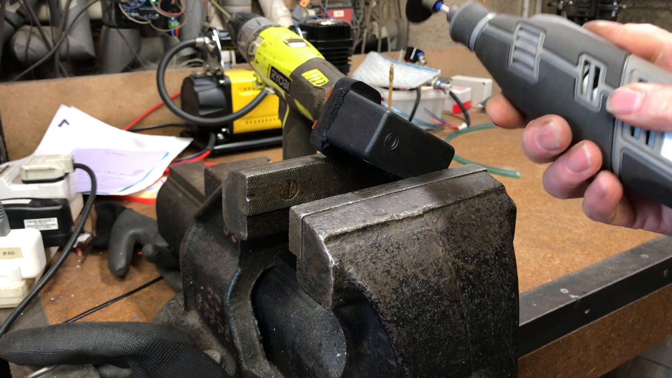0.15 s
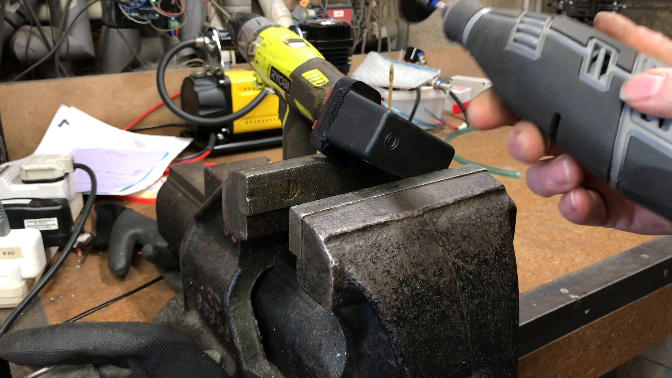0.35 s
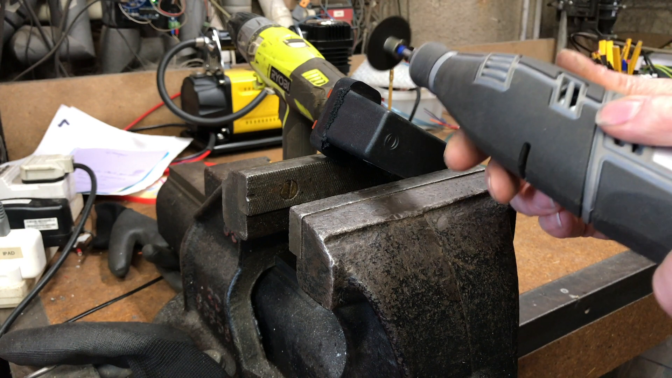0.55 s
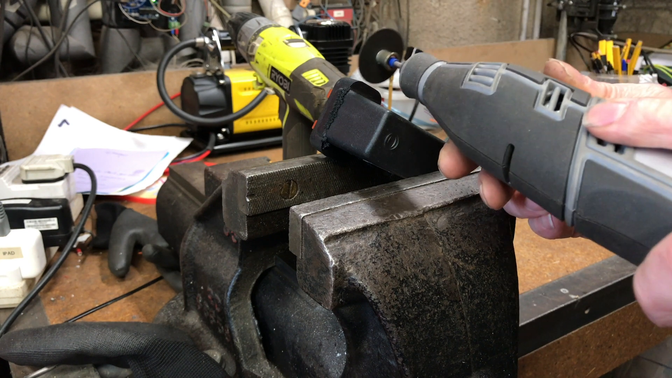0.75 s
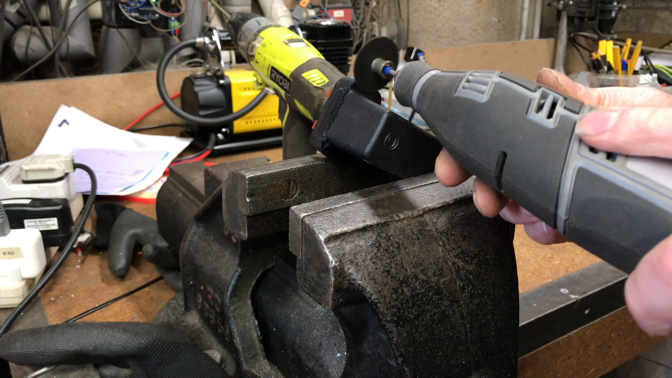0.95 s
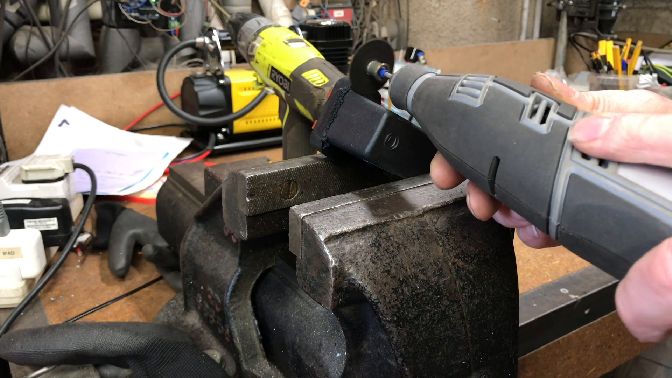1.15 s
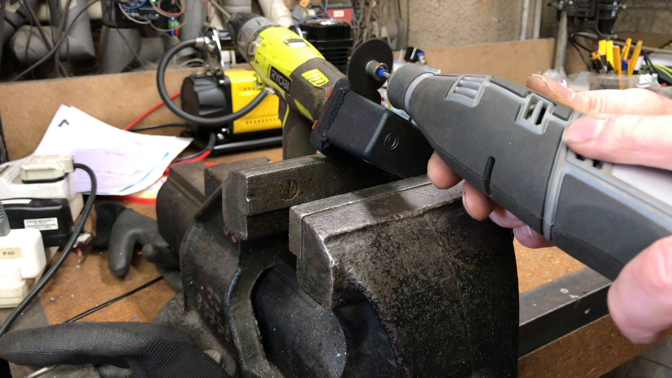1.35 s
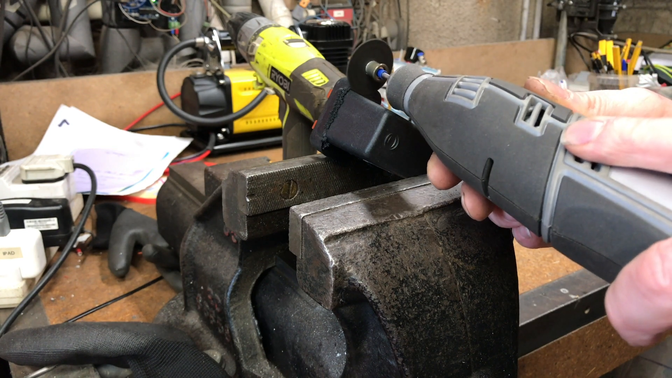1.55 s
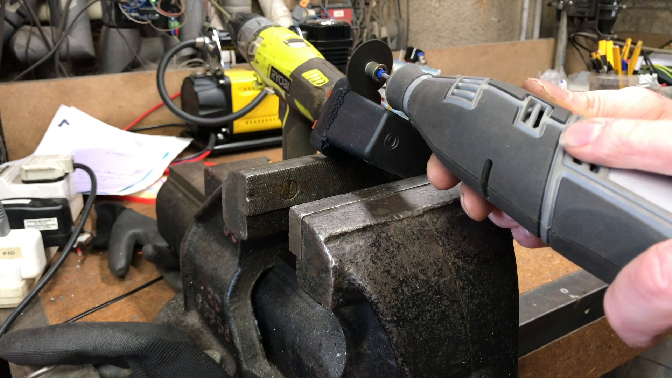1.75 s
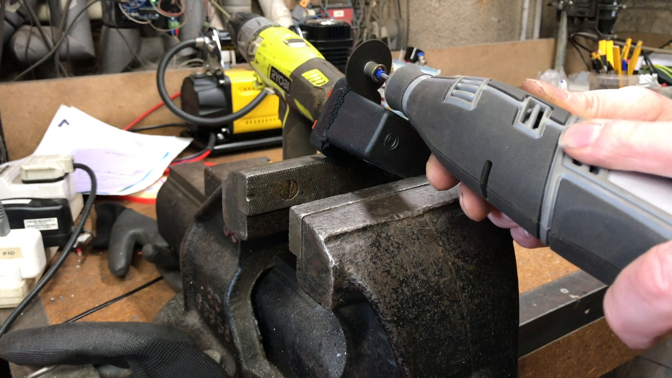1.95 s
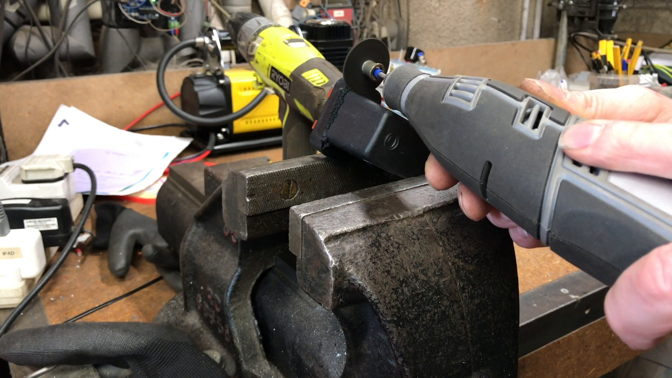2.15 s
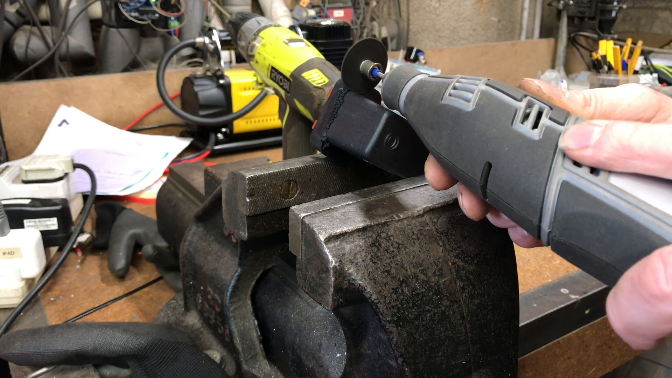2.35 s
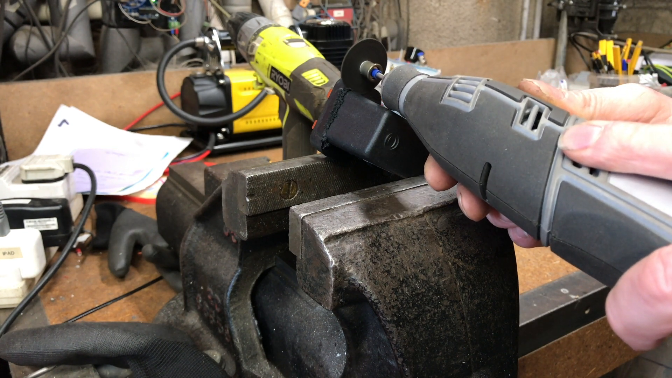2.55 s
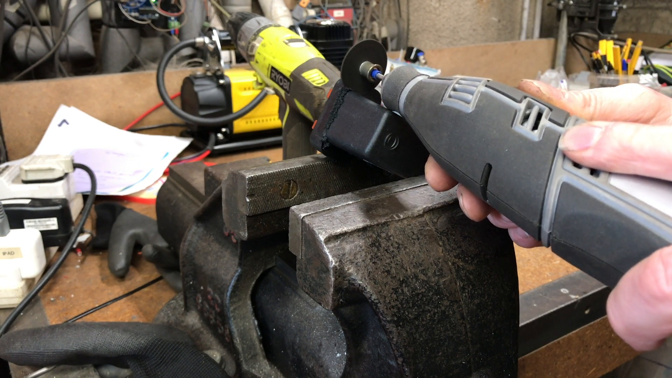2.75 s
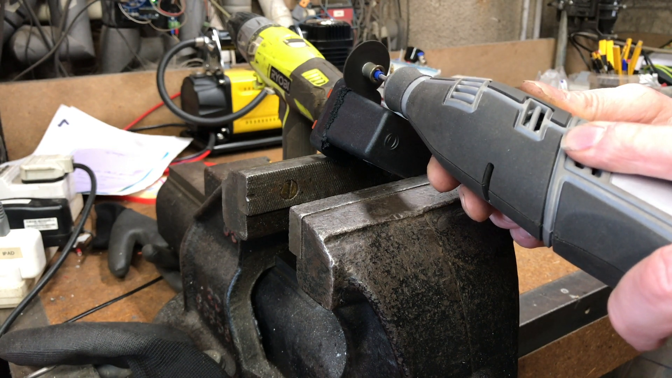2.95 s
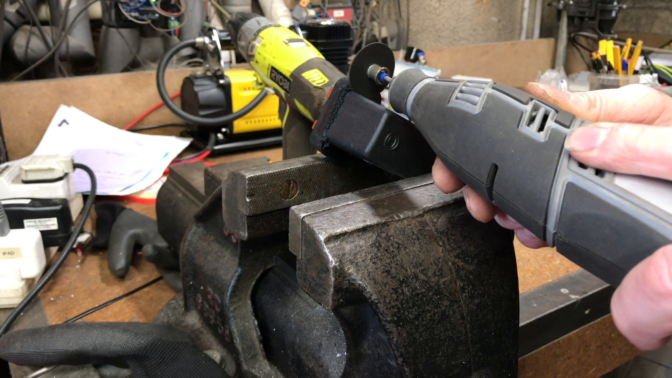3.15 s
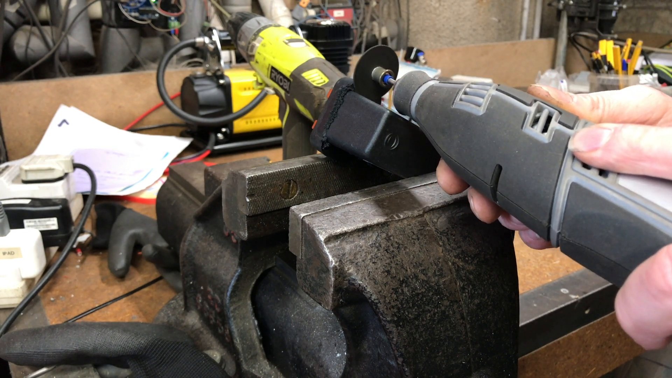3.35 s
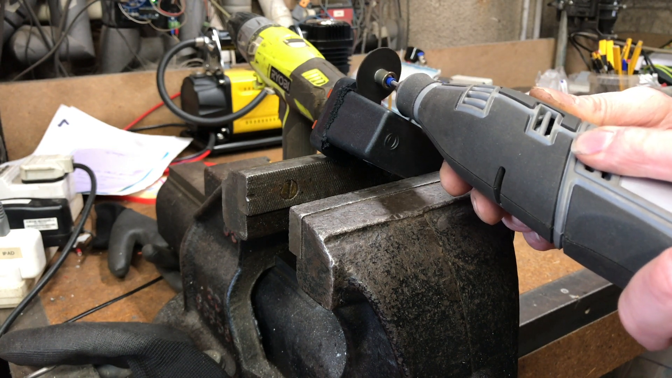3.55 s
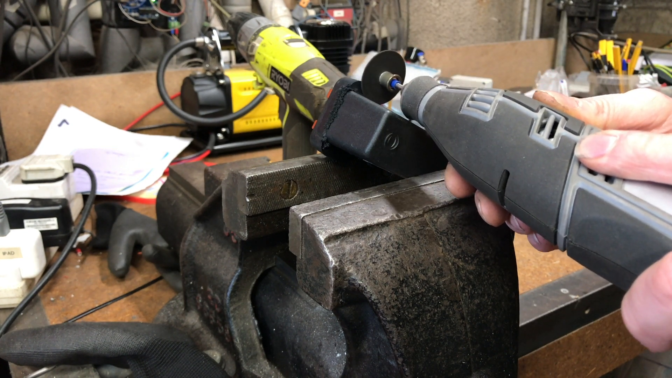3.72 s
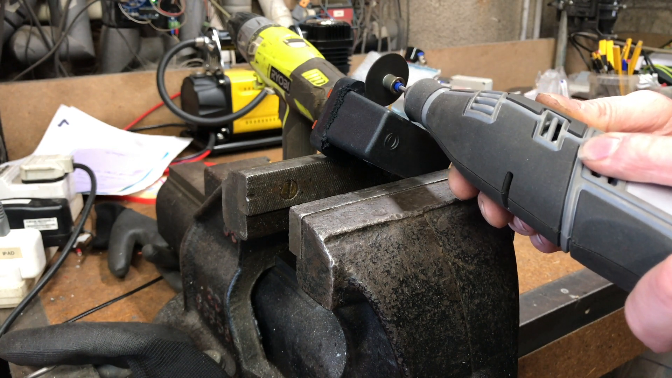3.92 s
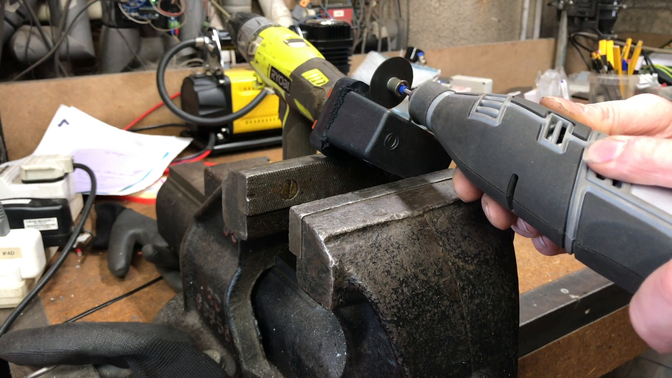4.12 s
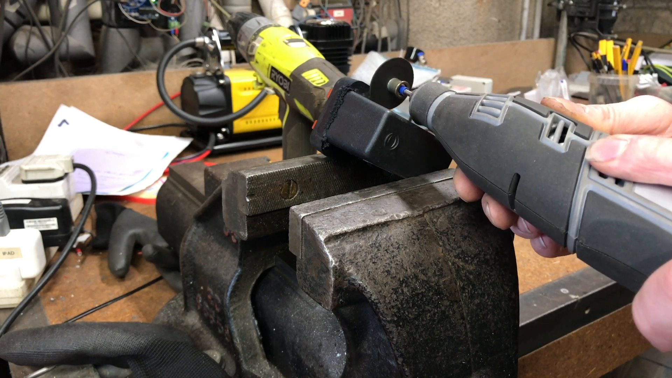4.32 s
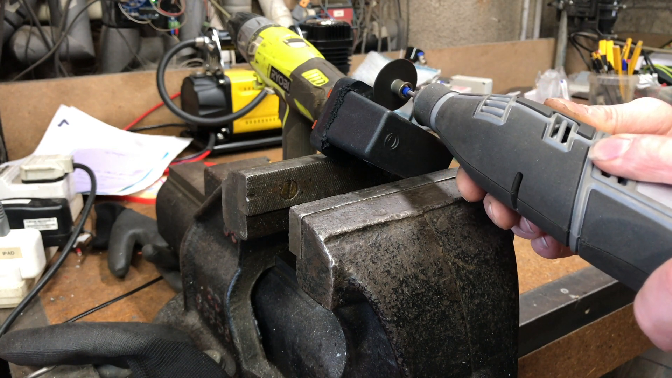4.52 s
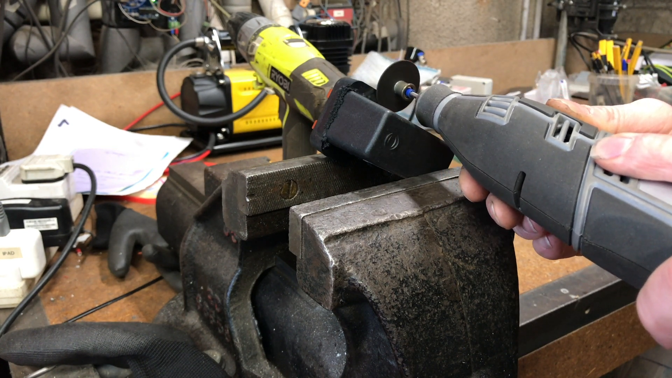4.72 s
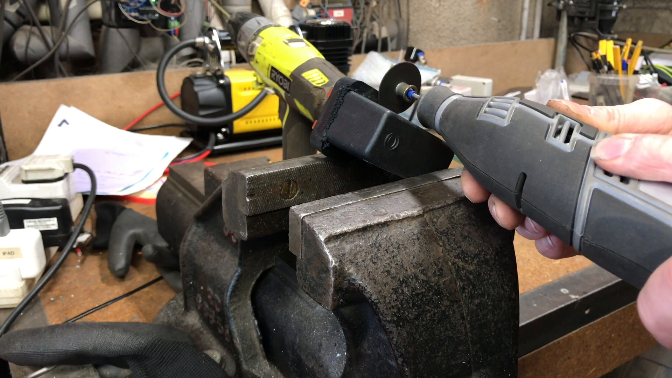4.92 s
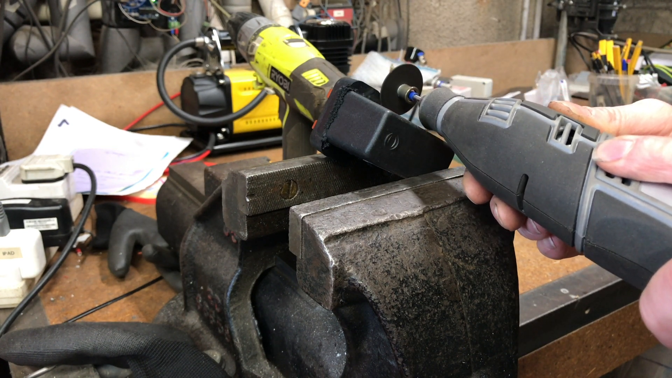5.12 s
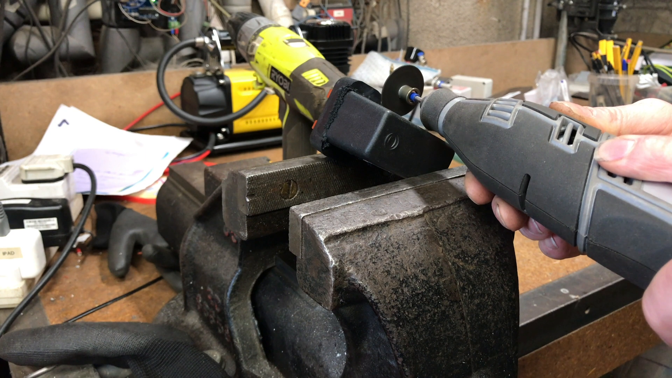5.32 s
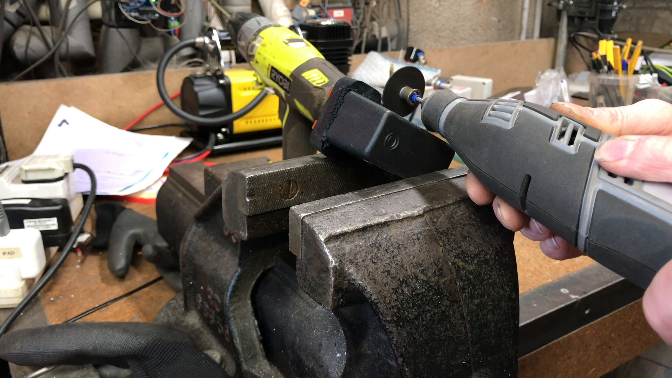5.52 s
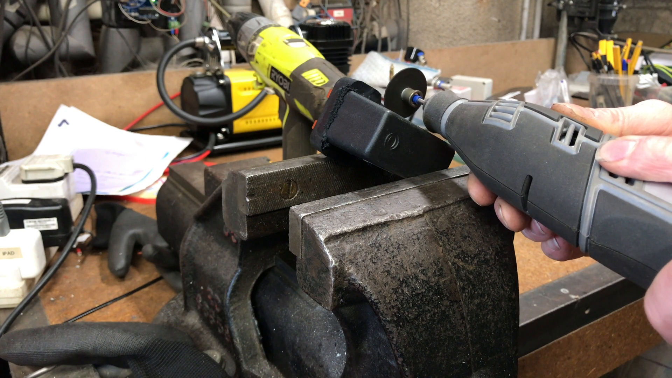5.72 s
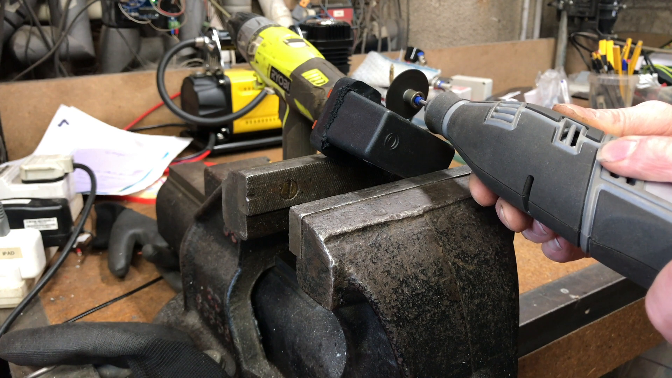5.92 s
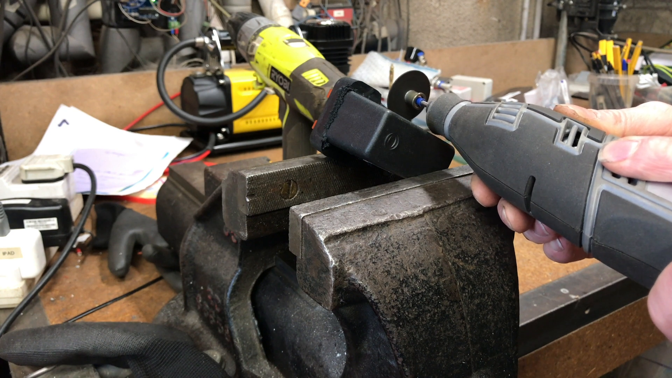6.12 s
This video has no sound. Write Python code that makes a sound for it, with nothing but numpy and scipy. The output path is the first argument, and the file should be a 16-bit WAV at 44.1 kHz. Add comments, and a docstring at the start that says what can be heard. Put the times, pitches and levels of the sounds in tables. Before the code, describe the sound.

Close single-microphone sound of a handheld rotary tool: a rising electric whine with hissy air and soft handling bumps, a short free run, then contact. The motor drops in pitch under load while the disc rasps brightly and the plastic case rattles and buzzes. Pitch lifts briefly later, then sinks back; cutting continues to the abrupt end over faint mains hum.

```python
"""A small rotary tool spins up in a workshop and its thin disc is pressed into a plastic case held in a vice.
One speed curve turns everything: motor tones, brushes, bearing and cut; noise adds the fan's air.
The load drags the speed down; the uneven rim bites once a turn, knocks the case and rasps in the slot.
The grip thuds softly near the start and mains hum lies under it all; one microphone."""
import sys
import numpy as np
from scipy import signal
from scipy.fft import rfft, irfft
from scipy.io import wavfile
from scipy.ndimage import map_coordinates

SR = 44100
rng = np.random.default_rng(int(sys.argv[2]) if len(sys.argv) > 2 else 0)


def to_wav(s):
    """Save 16-bit WAV."""
    ch = np.atleast_2d(s).T  # columns
    pcm = np.round(np.clip(ch, -1, 1) * 32767)  # PCM
    wavfile.write(sys.argv[1], SR, pcm.astype(np.int16))


N = 276507

# motor: (time [s], tones level [dB], brushes level [dB], air level [dB])
MOTOR = [(0, -51, -51, -49), (.12, -61, -62, -42), (.18, -52, -39.5, -41), (.3, -41.5, -38.5, -38.5),
         (.42, -39.5, -35.5, -39.5), (.5, -42.5, -41.5, -38.5), (.92, -42, -36.5, -38),
         (1.03, -45, -32, -38), (1.1, -40.5, -39, -38.5), (1.3, -41.5, -46, -37), (1.6, -42, -34.5, -40),
         (1.78, -63.5, -37, -52), (6.27, -55.5, -63.5, -31)]
# how the motor housing colours brushes and air: (frequency [Hz], relative level [dB])
HOUSING = [(60, -33), (150, -22.5), (350, -23.5), (900, -17.5), (1150, -18.5), (1400, -11), (2600, -17),
           (3200, -18.5), (4300, -23.5), (5700, -12), (6800, -15), (8600, -9), (10500, -17.5),
           (15500, -46.5)]
# the cut: (time [s], rasp of the disc level [dB], shaking of the case level [dB])
CUT = [(1.31, -34, -44), (1.32, -29, -57), (1.43, -26, -43), (1.45, -26, -37), (1.54, -26.5, -32),
       (1.61, -25, -40), (1.67, -25, -28), (1.72, -20.5, -34), (1.9, -29, -30.5), (1.92, -20.5, -30),
       (2.15, -19.5, -26.5), (2.5, -20.5, -30.5), (2.54, -21.5, -27), (2.68, -25.5, -32),
       (2.76, -20.5, -27), (2.9, -23, -33.5), (2.95, -31, -35.5), (2.99, -20, -26.5), (3.85, -19, -27),
       (4.16, -17.5, -26.5), (4.21, -23, -27.5), (4.27, -18.5, -25.5), (4.5, -18, -28.5),
       (4.54, -24.5, -34.5), (4.64, -30.5, -44), (4.67, -19, -33.5), (4.71, -19.5, -26), (5.04, -16, -24.5),
       (5.07, -18, -25.5), (5.43, -20, -27), (6.14, -18.5, -30.5), (6.16, -18, -26), (6.27, -18, -26)]
CUT_START_S = CUT[0][0]


def from_db(db):
    """Turn decibels into a plain multiplier."""
    return 10 ** (np.asarray(db) / 20)


def rms_one(x):
    """Scale to an rms (average strength) of 1."""
    return x / np.sqrt(np.mean(x ** 2) + 1e-20)


def in_time(rows):
    """Read each column of a timed table at every sample."""
    s, *columns = np.transpose(rows)
    return [np.interp(np.arange(N) / SR, s, c) for c in columns]


def at_hz(points, hz):
    """Read a spectrum table at any frequency, on a log-frequency axis."""
    table_hz, table_db = np.transpose(points)
    return np.interp(np.log(hz), np.log(table_hz), table_db)


def drift(rate_hz):
    """Slow random wandering: noise smoothed twice, then scaled to rms 1."""
    # made at a 40th of the sample rate, then filled in
    r = np.exp(-80 * np.pi * rate_hz / SR)
    noise = rng.standard_normal(N // 40 + 2002)
    slow = signal.lfilter([1], [1, -2 * r, r * r], noise)[2000:]
    return np.interp(np.arange(N) / 40, np.arange(len(slow)), rms_one(slow))


def colour(x, spectrum, size=4096):
    """Filter by a spectrum with no sound ahead of its cause (minimum phase); rms 1."""
    hz = np.fft.rfftfreq(size, 1 / SR) + 1
    log_gain = np.log(from_db(at_hz(spectrum, hz)))
    # folding the cepstrum puts the whole response after time zero
    cepstrum = irfft(log_gain)
    cepstrum[1:size // 2] *= 2
    cepstrum[size // 2 + 1:] = 0
    response = irfft(np.exp(rfft(cepstrum)))
    return rms_one(signal.fftconvolve(x, response)[:N])


def swell(turns, per_turn, sharp):
    """A strength that peaks `per_turn` times a turn; rms 1."""
    return rms_one(np.exp(sharp * np.cos(2 * np.pi * per_turn * turns)))


def orders(turns, table, waver_db, waver_rate, gain=lambda k: 1):
    """Tones on multiples of the shaft rate, each wavering in its own way; rms 1."""
    total = 0
    for k, db in table:
        level = from_db(db + waver_db * np.tanh(drift(waver_rate)))
        total = total + gain(k) * level * np.cos(2 * np.pi * k * turns + k * k / 12)
    return rms_one(total)


def motor_tones(turns):
    """Imbalance hums at multiples of the shaft rate, with the bearing on top."""
    # (multiple of the shaft rate, relative level [dB])
    motor_orders = [(1, 0), (2, -8), (3, -11), (4, -14), (5, -11), (6, -6), (7, -13), (12, -5), (21, -9),
                    (22, -2), (24, -7), (32, -6), (33, -3)]
    tones = orders(turns, motor_orders, waver_db=2.5, waver_rate=2.5)
    bearing_db = -9  # against the motor tones
    return from_db(in_time(MOTOR)[0]) * (tones + from_db(bearing_db) * bearing(turns))


def bearing(turns):
    """Ball tones that throb as the bearing's cage goes round more slowly than the shaft."""
    cage_per_turn = .1396
    balls = orders(turns, [(8, 0), (9, -1)], waver_db=3, waver_rate=5)
    return balls * swell(turns * cage_per_turn, per_turn=1, sharp=1.6)


def worn_surface(turns, memory, size=256):
    """Roughness round a rim, met again each turn and slowly wearing into a new pattern."""
    memory = np.clip(memory, 0, .999)
    fresh = rng.standard_normal((int(turns[-1]) + 203, size))
    rim = signal.lfilter([1], [1, -memory], fresh, axis=0)[200:].ravel()
    return rms_one(map_coordinates(rim, [turns * size], order=3))


def brushes(turns):
    """Brushes rub the commutator's worn surface; a thin rustling hiss follows the rasp of the cut."""
    rub = colour(worn_surface(turns, memory=0.93), HOUSING)
    rustle_db = -8.5  # against the rasp level
    fade_in = np.clip((np.arange(N) / SR - CUT_START_S) / .5, 0, 1) ** 2  # over 0.5 s
    thin_hiss = signal.sosfilt(signal.butter(2, 500, "high", fs=SR, output="sos"), rub)
    rustle = from_db(rustle_db + in_time(CUT)[0]) * fade_in * thin_hiss
    return from_db(in_time(MOTOR)[1]) * rub + rustle


def fan_air():
    """The fan's rush of air: noise coloured by the housing."""
    return from_db(in_time(MOTOR)[2]) * colour(rng.standard_normal(N), HOUSING)


def chopper_whistle(turns):
    """The speed control's steady whistle, with side tones that move with the shaft."""
    chopper_hz = 8000
    # (offset from the whistle [multiples of the shaft rate], level [dB rms])
    sidebands = [(0, -54), (3, -48), (-3, -59)]
    chopped = chopper_hz * np.arange(N) / SR
    return sum(np.sqrt(2) * from_db(db) * np.sin(2 * np.pi * (chopped + k * turns)) for k, db in sidebands)


def hum():
    """Mains hum: steady tones."""
    # (frequency [Hz], level [dB rms])
    mains = [(50, -38), (150, -68.5)]
    t = np.arange(N) / SR
    return sum(np.sqrt(2) * from_db(db) * np.sin(2 * np.pi * hz * t) for hz, db in mains)


def handling():
    """Dull thuds of the grip on the housing and one slow pressure dip at the microphone."""
    sway_s, sway_db, sway_width_s = .265, -26.5, 0.054
    # grip shifting on the tool: (time [s], level [dB], frequency [Hz], time to fall 60 dB [s])
    fumbles = [(0.14, -32, 274, 0.042), (0.193, -41, 301, 0.047), (0.242, -28, 245, 0.025)]
    t = np.arange(N) / SR
    out = -from_db(sway_db) * np.exp(-.5 * ((t - sway_s) / sway_width_s) ** 2)
    for s, db, hz, t60 in fumbles:
        age = np.clip(t - s, 0, 1)
        soft_start = 1 - np.exp(-age / 0.0017)
        out = out + from_db(db - 60 * age / t60) * soft_start * np.sin(2 * np.pi * hz * age)
    return out


def snagging():
    """Chatter wanders about its steady value and rises in each spell where the disc snags."""
    # (start [s], length [s], chatter [0-1])
    snags = [(1.74, .03, .75), (2.12, .12, .75), (2.52, .03, .8), (2.74, .05, .85), (3.01, .07, .8),
             (3.49, .06, .75), (3.79, .04, .8), (4.02, .04, .8), (4.2, .33, .88), (4.74, .3, .78),
             (5.1, .92, .87), (6.17, .1, .75)]
    graze_chatter, steady_chatter, bed_in_s = .33, .52, .5  # cleaner until the disc beds in
    edge_s, wander = .03, .07
    t = np.arange(N) / SR
    steady = np.interp(t - CUT_START_S, [0, bed_in_s], [graze_chatter, steady_chatter])
    spells = []
    for s, length, top in snags:
        inside = np.clip(np.minimum(t - s, s + length - t) / edge_s + 1, 0, 1)
        spells.append(steady + (top - steady) * inside)
    return np.clip(np.max(spells, axis=0) + wander * drift(9), 0, .97)


def level_changes_db():
    """Brief dips and rises in the level of the cut."""
    # (centre [s], half-length [s], level change [dB])
    dips_and_rises = [(1.346, 0.016, -3.5), (1.64, .03, -3), (1.863, 0.023, -1), (1.981, 0.027, -7),
                      (2.473, .04, -3), (2.66, 0.032, 0), (2.876, 0.047, -2.5), (3.78, 0.027, -0.5),
                      (4.0, 0.027, 0.5), (5.86, .03, 3)]
    t = np.arange(N) / SR
    return sum(db * np.clip(1 - np.abs(t - s) / half, 0, 1) for s, half, db in dips_and_rises)


def case_knocks(turns, speed_hz, chatter):
    """Bites knock the case at shaft multiples; the wall rings loudest and the bench echoes."""
    # (multiple of the shaft rate, relative level [dB])
    bite_orders = [(2, -5), (4, 9.5), (5, 7), (6, 13.5), (7, 8.5), (8, 10), (9, 7.5), (10, 8.5), (11, 2.5),
                   (12, 4.5), (13, -1.5), (14, 4), (15, -28), (16, -20), (17, -3.5), (18, -14)]
    # loudest ring of the case wall, shifting as the slot grows: (time [s], frequency [Hz])
    wall = [(1.35, 1440), (2.12, 1500), (2.76, 1366), (3.16, 1754), (3.45, 1677), (3.91, 1670),
            (4.05, 1880), (4.14, 1560), (4.6, 1873), (5.32, 1500), (5.71, 1610), (6.27, 1430)]
    wall_hz, wall_width_hz, wall_db = in_time(wall)[0], 100, 11
    bite_jitter_turns = .012  # times chatter and drift: bites come a little early or late

    def wall_gain(k):
        """Shaft multiples near the wall's own ring come out louder."""
        return 1 + from_db(wall_db) / (1 + (2 * (k * speed_hz - wall_hz) / wall_width_hz) ** 2)

    jittered = turns + bite_jitter_turns * chatter * drift(25)
    knocks = orders(jittered, bite_orders, waver_db=5.0, waver_rate=6.0, gain=wall_gain)
    # the bench throws the knocks back upside down
    echo_samples, echo_gain = round(0.00141 * SR), 0.42
    knocks[echo_samples:] -= echo_gain * knocks[:-echo_samples].copy()
    return rms_one(knocks)


def three_lobe_tone(turns, speed_hz):
    """Three lobes a turn and their double, loudest where the clamping resonates."""
    lobes_db, lobes_hz, lobes_width_hz = -8.5, 486, 212
    resonance = 1 / (1 + (2 * (3 * speed_hz - lobes_hz) / lobes_width_hz) ** 2)
    tone = sum(from_db(db) * np.cos(2 * np.pi * k * turns) for k, db in [(3, 1.22), (6, 5.65)])
    return from_db(lobes_db) * resonance * tone


def case_judder(bursts):
    """Chatter shakes the case with uneven bursts of noise."""
    # plastic case in the vice: (frequency [Hz], relative level [dB])
    case_spectrum = [(41, -69), (70, -10.5), (277, -14.5), (410, -5), (445, -10), (499, -5.5), (607, -10.5),
                     (1350, -2.5), (1520, 4.5), (2360, -2), (3500, -13), (4550, -11.5), (7700, -120)]
    return colour(bursts * rng.standard_normal(N), case_spectrum)


def rim_strikes(turns, speed_hz, ring_s, count=6):
    """The rim's high spot strikes once a turn; the contact rings in ways whose shares keep shifting."""
    samples_away = (turns - np.round(turns)) / speed_hz * SR
    click = np.exp(-.5 * (samples_away / .55) ** 2)
    age = np.arange(800) / SR
    rings = rng.standard_normal((count, len(age))) * np.exp(-age / ring_s)
    shares = np.array([drift(8) for ring in rings])
    shares /= np.linalg.norm(shares, axis=0)
    return rms_one(sum(signal.fftconvolve(click * share, ring)[:N] for share, ring in zip(shares, rings)))


def disc_rasp(turns, speed_hz, chatter, bursts):
    """Once-a-turn grit and rough noise make the disc ring in a blend of two colours."""
    # share of the second colour: (time [s], share [0-1])
    blend_curve = [(1.31, .7), (1.5, 0.09), (2.1, 0.01), (2.85, 0), (3.0, .35), (3.25, 0.24), (3.9, 0.08),
                   (4.3, 1), (6.27, 1)]
    # first ringing colour of the disc: (frequency [Hz], relative level [dB])
    first_colour = [(1470, -17.5), (2500, -10.5), (2800, -18), (3320, -19.5), (3900, -2), (4110, -4.5),
                    (4570, -10.5), (5170, -9), (5660, -1), (6960, -2), (7750, 0), (9310, -2.5),
                    (10800, -15.5), (11400, -11.5), (15500, -25.5)]
    # second ringing colour of the disc: (frequency [Hz], relative level [dB])
    second_colour = [(1470, 4.5), (2500, -71), (2780, -11), (3140, -25), (3530, -8.5), (4200, -11.5),
                     (5090, -17), (6110, -10), (6600, -4), (8300, -6.5), (9240, -1), (9970, -8),
                     (10800, -14), (15500, -28.5)]
    blend = np.clip(in_time(blend_curve)[0], 0, 1)
    grit = rim_strikes(turns, speed_hz, ring_s=.0022)
    # rough noise swells very slightly, a little slower than once a turn
    rough_noise = swell(turns, per_turn=0.94, sharp=0.096) * bursts * rng.standard_normal(N)
    scrape = np.sqrt(1 - chatter ** 2) * grit + chatter * rough_noise
    # the thin disc radiates no lows
    scrape = signal.sosfilt(signal.butter(4, 2600, "high", fs=SR, output="sos"), scrape)
    rasp = np.sqrt(1 - blend) * colour(scrape, first_colour) + np.sqrt(blend) * colour(scrape, second_colour)
    # both colours share one scrape, so turn down the middle of the blend
    return rasp / np.sqrt(1 + 2 * np.sqrt(blend * (1 - blend)))


def cut(turns, speed_hz):
    """A clean cut repeats turn by turn; chatter breaks it into uneven bursts of noise."""
    judder_power, knock_flicker_db = 2.29, 4.5
    rasp_db, case_db = in_time(CUT)
    chatter = snagging()
    touching = np.clip((np.arange(N) / SR - CUT_START_S) / 0.0094, 0, 1)  # quick fade-in
    bursts = rms_one(from_db(2.34 * drift(105) + 2.2 * np.tanh(drift(14))))
    rough = chatter ** judder_power
    # knocks come and go while the disc chatters
    flicker = from_db(-knock_flicker_db * rough * np.abs(drift(6.2)))
    knocks = np.sqrt(1 - rough ** 2) * flicker * case_knocks(turns, speed_hz, chatter)
    shaking = knocks + three_lobe_tone(turns, speed_hz) + rough * case_judder(bursts)
    rasp = disc_rasp(turns, speed_hz, chatter, bursts)
    both = from_db(case_db) * shaking + from_db(rasp_db) * rasp
    return touching * from_db(level_changes_db()) * both


def scene():
    """All sources at one microphone, the same on both channels."""
    # shaft: (time [s], speed [turns per second])
    shaft = [(0, 137), (.05, 153), (.15, 213), (.294, 242.8), (.454, 258.3), (.574, 261.5), (1.003, 263.9),
             (1.347, 271.6), (1.447, 258), (1.55, 253), (1.711, 212.2), (1.79, 184), (1.876, 173.5),
             (1.99, 161.5), (2.16, 156.5), (2.41, 152.5), (2.479, 147.5), (2.544, 151.6), (2.7, 149.5),
             (2.973, 179.1), (3.038, 170.4), (3.173, 159.9), (3.34, 165.8), (3.522, 156.5), (3.717, 150.3),
             (3.841, 140.8), (3.975, 139), (4.056, 128.1), (4.15, 124.5), (4.25, 155), (4.405, 178.9),
             (4.485, 183.3), (4.69, 227.5), (4.79, 223), (4.899, 205), (5.05, 170.5), (5.173, 169.5),
             (5.25, 166), (5.6, 163.5), (5.68, 170), (5.752, 170.3), (5.882, 164.4), (6.0, 163),
             (6.09, 158.5), (6.266, 154.9)]
    speed_hz = in_time(shaft)[0]
    turns = np.cumsum(speed_hz) / SR
    tool = motor_tones(turns) + brushes(turns) + fan_air() + chopper_whistle(turns)
    return np.tile(tool + hum() + handling() + cut(turns, speed_hz), (2, 1))


def record(dry):
    """The input stage squeezes peaks, then a steep filter cuts the top."""
    cutoff_hz = 15700
    squeezed = .34 * np.tanh(dry / .34)
    return signal.sosfilt(signal.ellip(12, .5, 70, cutoff_hz, fs=SR, output="sos"), squeezed)


dry = scene()
out = record(dry)
to_wav(out)
```